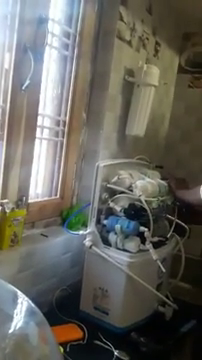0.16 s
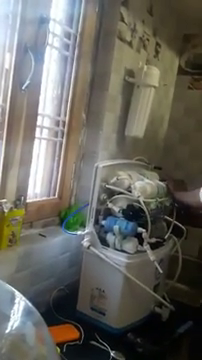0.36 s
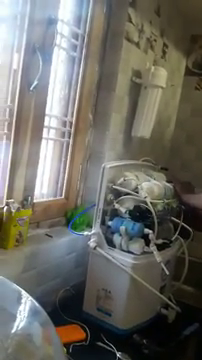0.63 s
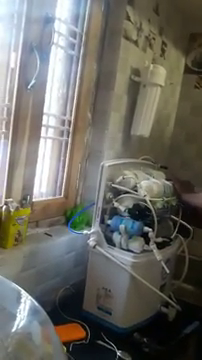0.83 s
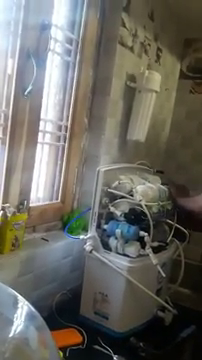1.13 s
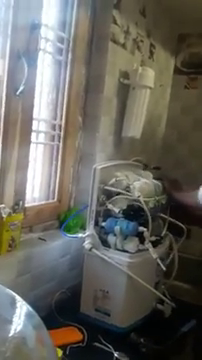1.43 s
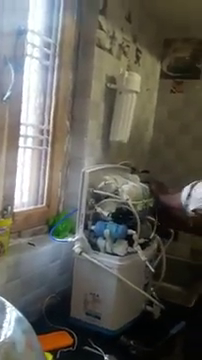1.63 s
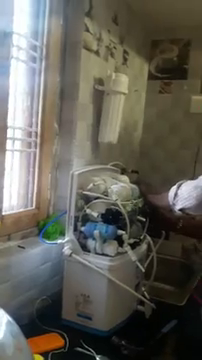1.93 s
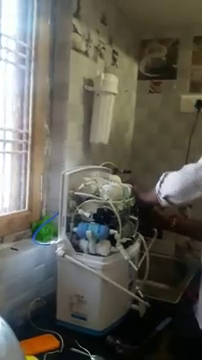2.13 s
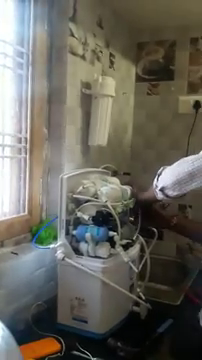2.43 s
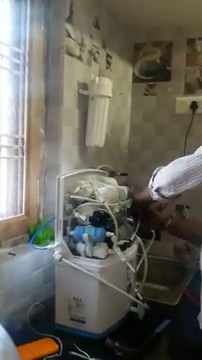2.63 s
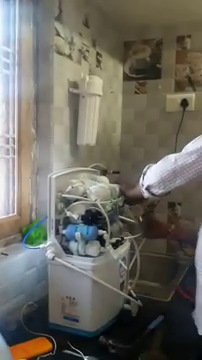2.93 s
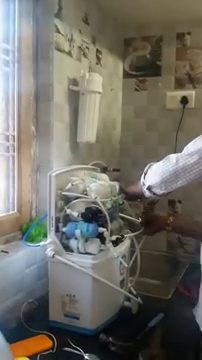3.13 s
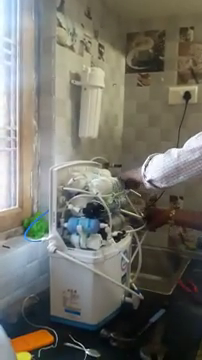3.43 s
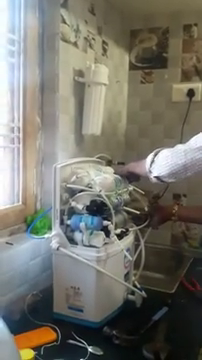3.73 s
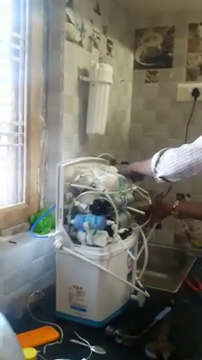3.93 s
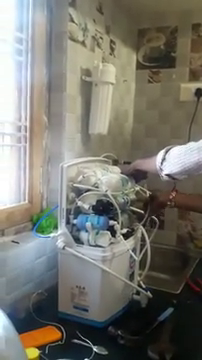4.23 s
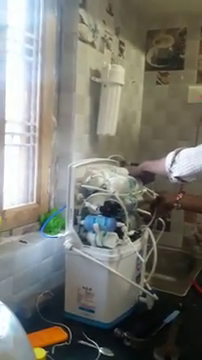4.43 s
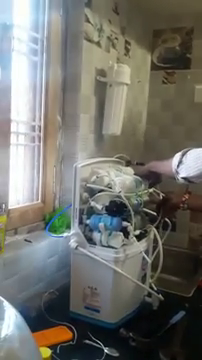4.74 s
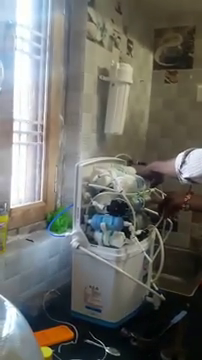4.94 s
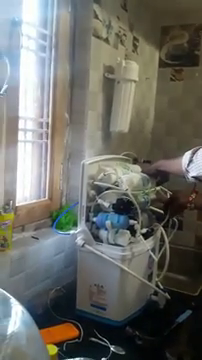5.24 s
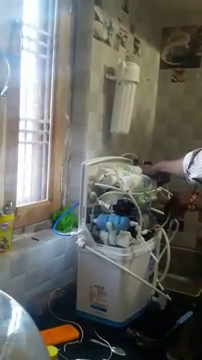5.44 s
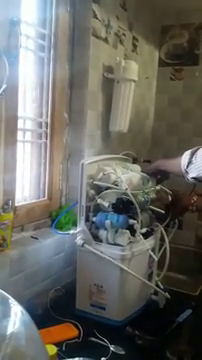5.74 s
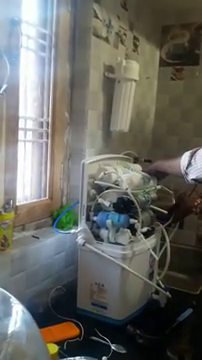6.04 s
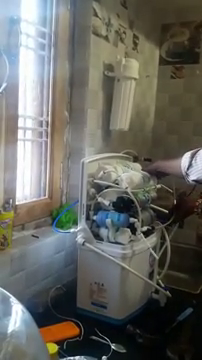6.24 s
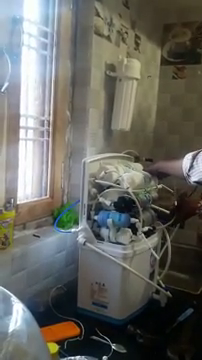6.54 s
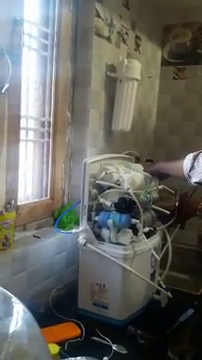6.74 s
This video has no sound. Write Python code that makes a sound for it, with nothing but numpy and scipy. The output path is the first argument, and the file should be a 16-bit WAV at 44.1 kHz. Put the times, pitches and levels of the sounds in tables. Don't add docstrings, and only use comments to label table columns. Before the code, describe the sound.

A close handheld microphone in a small tiled kitchen picks up low room drone and a water purifier pump, knocking softly about eleven turns a second with a faint motor hum. From 0 to 1.2 seconds a hose leaks thinly, with small squirts, spritzes, airy squeaks, drips and light bumps on the plastic case; a hollow knock comes at 1.1. At about 1.3 to 1.5 a sharp spit of spray booms briefly in the tank. Quieter squirts and pump knocking continue until 2.8, when a tiny air hiss gives way abruptly to a loud, bright water jet. It slowly weakens and dulls, dipping briefly near 4.3 and failing after 4.8. Around 5.4 it breaks into strong splashy squirts, then spatter and a thin trickle. From 6.1 low gurgles mingle with drips, squeaks and bumps until 6.9, the pump still running.

```python
import sys
import numpy as np
from scipy import signal
from scipy.fft import rfft, irfft
from scipy.io import wavfile
from scipy.ndimage import uniform_filter1d

SR = 44100
rng = np.random.default_rng(int(sys.argv[2]) if len(sys.argv) > 2 else 0)


def waveform_to_disk(signal):
    frames = np.transpose(np.atleast_2d(signal))
    scaled = np.clip(frames, -1, 1) * 32767
    samples = np.round(scaled).astype(np.int16)
    wavfile.write(sys.argv[1], SR, samples)


def voltage_ratio(level):
    return 10 ** (np.asarray(level, float) / 20)


N = 302967

# (time [s], level [dB])
JET_LEVEL = [
    (2.783, -32.5),
    (2.822, -29.5),
    (2.832, -13),
    (2.89, -13),
    (3.37, -16),
    (4.1, -17.5),
    (4.26, -20.5),
    (4.41, -17.5),
    (4.82, -20.5),
    (5.42, -41),
]
# (frequency [Hz], density [dB per Hz])
JET_FULL_TONE = [(120, -36), (250, -21.5), (500, -14), (1000, -13.5), (1700, -6), (2300, -5.5),
                 (2950, -10.5), (3400, 0), (3800, -10.5), (6000, -6.5), (7400, -6), (9500, -13),
                 (13000, -18.5), (16000, -23)]
# (frequency [Hz], density [dB per Hz])
JET_SPENT_TONE = [(120, -23), (250, -16), (500, -12), (1000, -3), (1500, 2), (2000, 3.5), (2700, 2),
                  (3300, -1.5), (3800, -8), (5700, -6), (7400, -9), (9500, -16.5), (13000, -18.5),
                  (16000, -28)]
# (frequency [Hz], width [Hz], gain [dB], drift as pressure drops [Hz])
NOZZLE_HOLLOWS = [(4230, 220, 2, 50), (4600, 200, -0.5, 0), (5300, 150, 3, -100), (6040, 260, 3, -300),
                  (7120, 620, 1, 100), (7950, 230, -4.5, 100), (8500, 330, 2.5, 0), (12500, 1400, 2.5, 0)]
# (frequency
# [Hz], level [dB])
WALL_MODES = [(190, -51), (800, -50), (1260, -51), (1437, -49), (2170, -46), (2455, -42), (2735, -38),
              (2826, -42), (2961, -31.5), (3133, -44), (3564, -45), (4215, -44), (5744, -45), (7251, -43)]
# (frequency [Hz], width [Hz], level [dB])
SLOSH_MODES = [(270, 50, 5.5), (346, 45, -4), (451, 92, 6.5), (516, 47, -3.5), (595, 43, -1)]

# (time [s], level [dB])
VENT_LEVEL = [
    (2.7825, -42),
    (2.798, -34),
    (2.802, -24.5),
    (2.82, -24),
    (2.828, -39),
    (2.87, -45),
]
# (frequency [Hz], density [dB per Hz])
VENT_TONE = [(800, -25), (3000, -2), (4200, -6), (7200, 3), (9000, -11), (12000, -3), (16000, -12)]
# (time [s], level [dB])
SPIT_LEVEL = [
    (1.292, -36),
    (1.312, -27.5),
    (1.358, -31),
    (1.372, -24),
    (1.394, -31.5),
    (1.47, -32),
    (1.58, -34.5),
    (1.734, -61),
    (1.8, -48),
]
# (frequency [Hz], density [dB per Hz])
SPIT_TONE = [(290, 0.5), (500, -2), (613, -28), (678, -29), (843, -7.5), (1820, -6.5), (3250, -0.5),
             (3750, -6.5), (5800, -2), (12500, -11.5), (16000, -19)]
# (time [s], level [dB])
TANK_SURGES = [
    (1.312, -53),
    (1.4, -27.5),
    (1.46, -44),
    (1.535, -36.5),
    (1.6, -47),
]
# (frequency [Hz], level [dB])
TANK_MODES = [(173, -2), (196, -12)]

# (time [s], peak level [dB], centre [Hz], decay t60 [s])
SQUIRTS = [(0.325, -39, 2920, 0.63), (.41, -35, 3600, 0.45), (0.4624, -33, 2400, 0.21),
           (0.639, -44, 2900, 0.85), (0.69, -34, 3100, 0.96), (1.1, -35, 2500, .5), (.96, -38, 1700, .4),
           (1.3665, -34, 3340, .21), (1.8452, -29, 3040, 0.46), (2.1034, -27.5, 2660, 0.25),
           (2.2806, -33, 2900, 0.28), (2.3594, -34, 3160, 0.3), (2.4087, -32, 2030, 0.16),
           (2.6774, -33, 2830, 0.2), (5.2425, -33, 2000, 0.1), (5.385, -21, 2530, .2),
           (5.3991, -10.5, 2680, .16), (5.4392, -13.5, 2360, 0.18), (5.556, -32, 2720, 0.22),
           (5.613, -23, 2590, 0.34), (5.675, -26, 2710, 0.22), (5.7446, -28, 3040, 0.2),
           (5.9745, -29, 3020, 0.24), (6.1673, -32, 1870, .41), (6.2184, -28, 2360, 0.59),
           (6.085, -33, 2880, 0.22), (6.445, -26.5, 3130, 0.29), (6.477, -31, 3700, 0.23),
           (6.81, -29, 2900, .5)]
# (time [s], peak level [dB], centre [Hz], decay t60 [s])
SPRITZES = [(2.776, -37, 7000, .3), (0.038, -33.5, 6700, 0.42), (0.2094, -33, 4870, 0.21),
            (0.4123, -41, 4600, 0.72), (0.475, -28.5, 4370, 0.37), (0.59, -35.5, 5640, 0.22),
            (0.781, -29, 5150, 0.25), (0.8587, -34.5, 5600, 0.89), (0.9554, -28.5, 5840, 0.22),
            (1.1283, -37, 5400, 0.23), (2.1021, -32, 5470, 0.31), (2.2338, -38, 7310, 0.23),
            (2.3206, -39, 6850, 0.45), (2.5207, -40, 6400, .26), (5.246, -25, 7900, 0.15),
            (5.6127, -23, 5900, 0.17), (5.693, -25, 5500, 0.51), (5.9359, -31, 5100, .25),
            (6.2183, -27, 6200, 0.093), (6.5884, -26, 6950, 0.2), (.7337, -37, 4810, 0.37),
            (1.0216, -36, 5760, .3), (1.3683, -12, 6800, 0.11), (1.8532, -32.5, 5760, 0.63),
            (1.92, -42, 5440, 0.24), (5.3909, -27, 4800, 0.52), (6.1671, -28, 4930, 0.18),
            (6.3143, -28, 6800, .3), (6.3876, -28.5, 5240, 0.38), (6.8196, -32, 6000, .4)]
# (time [s], peak level [dB], centre [Hz], decay t60 [s])
MIST = [(.39, -41, 12500, 0.27), (1.75, -40, 11000, 0.14), (2.082, -41, 10500, .2), (2.36, -45, 11000, .25),
        (5.7244, -35, 10600, 0.18), (5.8316, -30, 8540, 0.22), (5.9828, -24.5, 8450, 0.22),
        (6.0194, -28, 12100, .18), (6.0444, -33, 8600, .2), (6.095, -23.5, 11200, 0.093),
        (6.219, -25.5, 8800, 0.12), (6.337, -33, 8500, .2), (1.0774, -38, 8200, 0.18),
        (1.4476, -14, 9470, .1), (2.55, -51, 12500, .3), (2.6, -49, 12000, 0.27), (5.391, -34, 12000, .2),
        (5.452, -29, 11000, .15), (5.613, -33, 11000, .2), (5.746, -33, 13000, .2),
        (5.893, -36, 11500, .15), (6.213, -29, 12800, .15), (6.335, -31, 13500, .25),
        (6.388, -31, 12500, .15), (6.476, -40, 9000, .15), (6.525, -39, 12500, .15),
        (6.603, -39, 11500, .2), (6.855, -39, 10500, .15)]
# (time [s], peak level [dB], centre [Hz], decay t60 [s])
SQUEAKS = [(0.0864, -32, 2280, 0.22), (0.088, -33.5, 1990, 0.33), (0.09, -31, 2880, 0.23),
           (0.156, -30.5, 3750, 0.2), (0.3699, -30, 2160, 0.2), (0.4084, -32, 2150, 0.19),
           (0.7806, -21.5, 3850, 0.3), (0.82, -37, 4050, 0.33), (0.77, -29, 3020, 0.23),
           (1.8452, -28.5, 2430, 0.35), (6.6398, -25.5, 3130, 0.46), (6.668, -29, 3140, 0.63),
           (6.7192, -25.5, 2280, 0.5), (6.78, -34, 2490, 0.45)]
# (time [s], peak level [dB], frequency [Hz])
DRIPS = [(0.3237, -34, 3020), (.0866, -37, 2400), (.781, -31, 3720), (0.4774, -39, 4540),
         (1.293, -24.5, 5550), (5.208, -29, 2500), (1.8502, -25, 2350), (5.243, -20, 2010),
         (5.2417, -20.5, 7830), (5.401, -22, 2520), (5.6133, -29, 2780), (5.693, -36, 2750),
         (5.724, -32, 2070), (5.7453, -23, 2930), (5.7657, -24.5, 3200), (5.893, -26, 3100),
         (5.9363, -28.5, 4730), (5.9494, -32, 6270), (5.984, -30, 5730), (6.0875, -32, 2780),
         (6.1404, -31, 3850), (6.166, -31, 2200), (6.329, -42, 2470), (6.4764, -23, 3820),
         (6.5877, -30, 3500), (6.6, -33, 7100), (6.64, -26, 2850), (6.2195, -41, 3270), (6.487, -33, 3600),
         (6.669, -35, 3120), (6.811, -35, 2800), (5.4815, -20.5, 2280)]
# (time [s], peak level [dB], frequency [Hz])
GULPS = [(6.092, -23, 532), (6.121, -27, 566), (6.152, -24, 553), (6.181, -21, 540), (6.209, -28, 530),
         (6.308, -21, 540), (6.322, -38, 545), (6.339, -25, 566), (6.357, -26, 480), (6.415, -28, 453),
         (6.446, -24, 530), (6.475, -24, 553), (6.498, -26, 484), (6.578, -36, 466)]

# (time [s], turns made [turns])
SHAFT_TURNS = [
    (.018, 0),
    (1.268, 14),
    (2.703, 30),
    (5.593, 64),
    (6.82, 79),
    (6.902, 80),
]
# (time [s], strength [dB], return stroke [dB])
STROKE_LOAD = [
    (0, -1, -5),
    (.45, 1.5, -8),
    (1.2, 1, -7),
    (1.8, 2, -1),
    (2.8, 1.5, -1),
    (5.5, 4, -5),
    (5.9, 3.5, -9),
    (6.2, 4, -4),
    (6.9, 4.5, -4),
]
# (frequency [Hz], width [Hz], main stroke [dB], return stroke [dB], lag [turns])
CASE_MODES = [(270, 35, -58, -58, .1), (430, 26, -50, -51, .07), (520, 35, -51, -52, .12),
              (618, 22, -55, -57, .15), (740, 34, -55, -64, -.06), (783, 34, -51.5, -57, -.06),
              (838, 30, -48, -49.5, -.07), (1030, 50, -54, -56, 0), (1370, 55, -58, -51, 0)]
# (multiple of shaft speed [1], level under pressure [dB], level relieved [dB])
MOTOR_HUM = [(15, -60, -68), (16, -61, -54.5), (17, -60, -64)]
# (time [s], peak level [dB], centre [Hz], decay t60 [s])
BUMPS = [(0.249, -35, 1380, 0.24), (0.465, -33, 450, 0.33), (0.519, -29, 560, 0.12),
         (0.819, -24.5, 564, 0.17), (2.119, -36, 1380, 0.27), (2.342, -37, 450, .15),
         (2.449, -29, 233, 0.42), (2.572, -32, 990, .15), (5.439, -31, 1000, 0.24),
         (5.489, -24.5, 202, 0.38), (5.6, -32, 265, 0.42), (1.15, -33, 300, .4), (5.68, -35, 460, 0.14),
         (6.229, -23.5, 990, 0.12), (6.369, -28, 860, 0.26), (6.525, -26.5, 830, 0.29),
         (6.652, -28, 367, 0.18), (6.739, -29, 440, 0.33), (6.829, -25, 460, .3)]
# (time [s], peak level [dB], frequency [Hz])
KNUCKLES = [
    (1.112, -34, 480),
    (1.125, -31, 188),
]

# (time [s], level [dB], body of the low mids [dB])
LEAK = [
    (0.0, -46.5, -1),
    (0.8, -48.5, 5),
    (1.13, -49, 9),
    (1.63, -47, 4.5),
    (2.8, -49, 5),
]
# (time [s], level [dB], body of the low mids [dB])
TRICKLE = [
    (5.0, -34.5, 7),
    (5.2, -32.5, 7.5),
    (5.45, -35.5, 2),
    (5.62, -39, 2.5),
    (5.8, -43.5, -7),
    (6.1, -42.5, -6),
    (6.18, -43.5, 5),
    (6.6, -41, 7.5),
    (6.92, -42.5, 4),
]
# (frequency [Hz], density [dB per Hz])
TRICKLE_TONE = [(530, -2), (900, 2.5), (1030, 2), (1720, 1.5), (2980, 6.5), (3600, 4), (4150, -0.5),
                (4800, 3.5), (6250, 2), (8030, -2.5), (12700, -7.5), (15700, -9)]
# (frequency [Hz], decay t60 [s])
KITCHEN_DECAY = [(200, 0.38), (1000, 0.38), (4000, 0.21), (12000, 0.2)]
# (frequency [Hz], density [dB per Hz])
AIR_TONE = [(18, -58), (30, -19), (60, -6.5), (134, -8), (180, -9.5), (300, -6), (390, -1.5), (550, 0.5),
            (700, -10), (1000, -11.5), (1670, -32), (3870, -37), (16000, -59)]
# (time [s], peak level [dB], centre [Hz], decay t60 [s])
HANDLING = [
    (5.25, -34, 129, 0.45),
    (5.47, -35, 85, 1),
]

HZ = np.fft.rfftfreq(512, 1 / SR)[:, None]
FRAME_S = np.arange(N // 128 + 5) * 128 / SR
T = np.arange(N) / SR


def evened(x):
    return x / np.sqrt(np.mean(x ** 2) + 1e-20)


def read(points, hz):
    f, value = np.transpose(points)
    return np.interp(np.log(hz + 1), np.log(f + 1), value)


def curves(rows, t):
    s, *columns = np.transpose(rows)
    return [np.interp(t, s, c) for c in columns]


def add(mix, s, sound):
    part = mix[round(s * SR):][:len(sound)]
    part += sound[:len(part)]


def gate(rows):
    start, end = rows[0][0], rows[-1][0]
    return np.interp(T, [start, start + .002, end - .03, end], [0, 1, 1, 0])


def swell(db, top_s, end_s, rise_db_per_s, fall_db_per_s):
    rise_db = rise_db_per_s * np.maximum(top_s - T, 0)
    fall_db = fall_db_per_s * np.maximum(T - end_s, 0)
    return voltage_ratio(db - rise_db - fall_db)


def resonate(x, hz, width):
    r = np.exp(-np.pi * width / SR)
    return signal.lfilter([1 - r * r, 0, r * r - 1], [2, -4 * r * np.cos(2 * np.pi * hz / SR), 2 * r * r], x)


def ringing(modes):
    gust = rng.standard_normal(N)
    total = np.zeros(N)
    for hz, width, db in modes:
        mode = resonate(resonate(gust, hz, width), hz, 3 * width)
        total += voltage_ratio(db) / np.sqrt(width) * mode
    return evened(total)


def hiss(tone_db, patchy_db, flicker_db):
    real, imag, patches = rng.standard_normal((len(FRAME_S), len(HZ), 3)).T
    for _ in range(3):
        patches = uniform_filter1d(patches, size=5, axis=0)
        patches = uniform_filter1d(patches, size=10, axis=1)
    patches = evened(patches)
    flicker = evened(uniform_filter1d(rng.standard_normal(len(FRAME_S)), size=3))
    tone = voltage_ratio(tone_db) * np.ones(real.shape)
    tone /= np.sqrt((tone ** 2).mean(0))
    spectrum = (real + 1j * imag) * tone * voltage_ratio(patchy_db * patches + flicker_db * flicker)
    return evened(signal.istft(spectrum, nperseg=512, noverlap=384)[1][:N])


def puffs(rows, rise_s, share, fizz_db, hold_s=0):
    out, t = np.zeros(N), np.arange(SR * 2 // 5) / SR
    fizz_tone = signal.butter(2, [1800, 12000], "bandpass", fs=SR, output="sos")
    for s, db, hz, t60 in rows:
        band, fizz, grain = rng.standard_normal((3, len(t)))
        width = hz * share
        for w in (width, width, 2 * width):
            band = resonate(band, hz, w)
        puff = evened(band) + voltage_ratio(fizz_db) * evened(signal.sosfilt(fizz_tone, fizz))
        grain_db = 3.0 * evened(uniform_filter1d(grain, size=130))
        decay_db = -60 * np.maximum(t - hold_s, 0) / t60
        envelope = voltage_ratio(db - 15.0 + decay_db) * (1 - np.exp(-t / rise_s))
        add(out, s, envelope * puff * voltage_ratio(grain_db))
    return out


def plinks(rows, t60, glide, tick, rise_cycles):
    out, t = np.zeros(N), np.arange(SR // 4) / SR
    for s, db, hz in rows:
        onset = np.minimum(t * hz / rise_cycles, 1)
        tone = np.sin(2 * np.pi * hz * (t + glide * t * t)) * voltage_ratio(-60 * t / t60) * onset
        impact = resonate(rng.standard_normal(len(t)), hz, 1.4 * hz)
        impact = evened(resonate(impact, hz, 1.4 * hz)) * voltage_ratio(-60 * t / 0.028)
        add(out, s, voltage_ratio(db + 2.0) * (tone + tick * impact))
    return out


def jet():
    drained = np.clip((FRAME_S - JET_LEVEL[0][0]) / 2.14, 0, 1)
    pressure = 0.64 * (1 - drained ** 3.8)
    pressure += 0.23 * np.exp(-abs(FRAME_S - JET_LEVEL[2][0]) / 0.45)
    spent = 1 - pressure

    edge_hz = 2300 + 720 * pressure
    colour_db = (0.8 + 10.4 * pressure) * np.exp(-((HZ - edge_hz) / 330) ** 2)
    for hz, width, db, drift in NOZZLE_HOLLOWS:
        colour_db = colour_db + db * np.exp(-((HZ - hz - drift * spent) / width) ** 2)
    gusts_db = 1.0 * evened(uniform_filter1d(rng.standard_normal(len(FRAME_S)), size=12))
    colour_db += gusts_db * np.clip(HZ / 9000, 0, 1.3) ** 2
    colour_db += pressure * read(JET_FULL_TONE, HZ) + spent * read(JET_SPENT_TONE, HZ)

    spray = hiss(colour_db, patchy_db=-0.5, flicker_db=0.98)
    spray += voltage_ratio(-28.0) * ringing(SLOSH_MODES)
    spray *= gate(JET_LEVEL) * voltage_ratio(curves(JET_LEVEL, T)[0])
    out = voltage_ratio(-2.0) * spray
    loud = slice(3 * SR, 5 * SR)
    for hz, db in WALL_MODES:
        ring = resonate(spray, hz, 18 + .004 * hz)
        out += voltage_ratio(db) * ring / ring[loud].std()
    return out


def vent():
    flow = gate(VENT_LEVEL) * voltage_ratio(curves(VENT_LEVEL, T)[0])
    return flow * hiss(read(VENT_TONE, HZ), patchy_db=2.5, flicker_db=2.5)


def spit():
    spray = voltage_ratio(curves(SPIT_LEVEL, T)[0]) * hiss(read(SPIT_TONE, HZ), patchy_db=0.5, flicker_db=1.5)
    surge = sum(swell(db, s, s, rise_db_per_s=450, fall_db_per_s=260) for s, db in TANK_SURGES)
    boom = surge * sum(voltage_ratio(db) * np.cos(2 * np.pi * hz * T) for hz, db in TANK_MODES)
    slosh = swell(-40.5, 1.47, 1.58, rise_db_per_s=87, fall_db_per_s=132) * ringing(SLOSH_MODES)
    return gate(SPIT_LEVEL) * (spray + boom + slosh)


def squirts():
    out = puffs(SQUIRTS, rise_s=0.00092, share=0.43, fizz_db=-16)
    out += puffs(SPRITZES, rise_s=0.0011, share=0.36, fizz_db=-17)
    return out + puffs(MIST, rise_s=0.0015, share=0.39, fizz_db=-12)


def squeaks():
    return puffs(SQUEAKS, rise_s=0.0008, share=0.26, fizz_db=-18.5, hold_s=0.016)


def drips():
    return plinks(DRIPS, t60=0.01, glide=7.1, tick=0.25, rise_cycles=1.0)


def gulps():
    return .72 * plinks(GULPS, t60=.036, glide=1.2, tick=.2, rise_cycles=3)


def spatter():
    lands = (rng.random(N) < 120 / SR) * (T > 5.2)
    size = voltage_ratio(-49 + 3.9 * np.minimum(rng.exponential(1, N), 3)) * lands
    t = np.arange(SR // 10) / SR
    splash = signal.oaconvolve(size, voltage_ratio(-60 * t / 0.012))[:N] * rng.standard_normal(N)
    return signal.sosfilt(signal.butter(2, [4000, 12500], "bandpass", fs=SR, output="sos"), splash)


def pump():
    turns = curves(SHAFT_TURNS, T)[0]
    load, return_gain = voltage_ratio(np.array(curves(STROKE_LOAD, T)))
    unevenness = voltage_ratio(.8 * rng.standard_normal(N))
    relieved = np.interp(T, [2.8, 5.4], [0, 1])
    out = np.zeros(N)
    for order, db, late_db in MOTOR_HUM:
        level = voltage_ratio(db + relieved * (late_db - db))
        out += level * np.sqrt(2) * np.cos(2 * np.pi * order * (turns - .6))
    for hz, width, main_db, return_db, lag in CASE_MODES:
        main = np.diff((turns - lag) % 1, prepend=0) < 0
        back = np.diff((turns - lag - .58) % 1, prepend=0) < 0
        strokes = voltage_ratio(main_db) * main + voltage_ratio(return_db) * return_gain * back
        push = resonate(load * unevenness * strokes, hz, 2.5 * width)
        out += resonate(push, hz, width) * SR / (np.pi * width)
    return out


def bumps():
    return puffs(BUMPS, rise_s=0.0011, share=0.21, fizz_db=-34)


def knuckles():
    return plinks(KNUCKLES, t60=0.086, glide=.01, tick=0.11, rise_cycles=1.5)


def trickle(rows, tilt_db, patchy_db):
    level_db, body_db = curves(rows, FRAME_S)
    octaves = np.log2(HZ / 4000 + .01)
    colour_db = tilt_db * octaves + body_db * np.exp(-((octaves + 1.35) / .55) ** 2)
    leak = hiss(read(TRICKLE_TONE, HZ) + colour_db, patchy_db, flicker_db=2.0)
    return gate(rows) * voltage_ratio(curves(rows, T)[0]) * leak


def handling():
    return puffs(HANDLING, rise_s=0.016, share=0.95, fizz_db=-33)


def kitchen(x):
    taps = np.zeros(SR // 2)
    at = np.arange(200, len(taps) - 20, 20)
    taps[at + rng.integers(0, 20, len(at))] = rng.choice([-1., 1.], len(at))
    hz, t, z = signal.stft(taps, SR, nperseg=256)
    decay = voltage_ratio(-60 * t / read(KITCHEN_DECAY, hz)[:, None])
    tail = signal.istft(z * decay, SR, nperseg=256)[1]
    return signal.oaconvolve(x, tail / np.linalg.norm(tail))[:N]


def air():
    hz = np.fft.rfftfreq(N, 1 / SR)
    spectrum = rfft(rng.standard_normal(N)) * voltage_ratio(read(AIR_TONE, hz))
    return voltage_ratio(-53.0) * evened(irfft(spectrum, N))


def scene():
    stream, knocks = jet(), pump()
    sprays = vent() + spit() + squirts() + squeaks() + bumps()
    drops = drips() + gulps() + spatter() + knuckles()
    to_room = voltage_ratio(-3.5) * resonate(stream, 1520, 7200) + voltage_ratio(-4.5) * sprays
    to_room += voltage_ratio(-3.5) * drops + knocks / 4
    near = stream + sprays + drops + knocks + kitchen(to_room)
    near += trickle(LEAK, tilt_db=-3, patchy_db=1.3)
    near += trickle(TRICKLE, tilt_db=-1.03, patchy_db=1.8)
    port = signal.butter(6, 145, "highpass", fs=SR, output="sos")
    mono = signal.sosfilt(port, near) + air() + handling()
    return np.array([mono, mono])


def roll_off(x):
    return signal.sosfilt(signal.butter(12, 16450, fs=SR, output="sos"), x)


def record(dry):
    edge = signal.firwin(1201, 15750, window=("kaiser", 8), fs=SR)
    bent = np.tanh(dry / 3) * 3
    narrow = signal.oaconvolve(bent, edge[None], "same")
    return roll_off(narrow)


dry = scene()
out = record(dry)
waveform_to_disk(out)
```